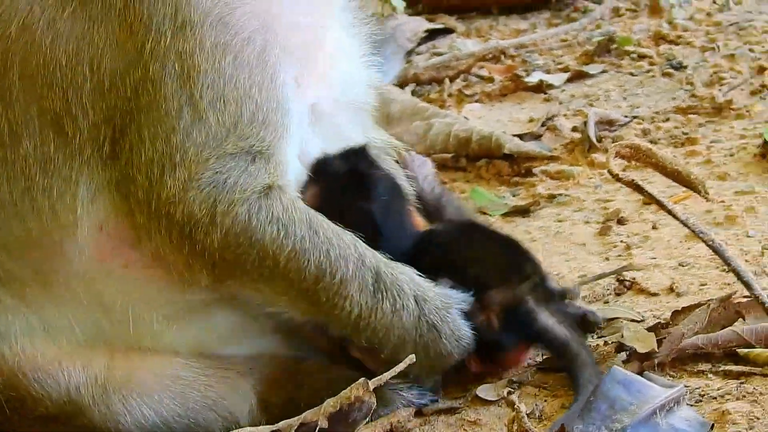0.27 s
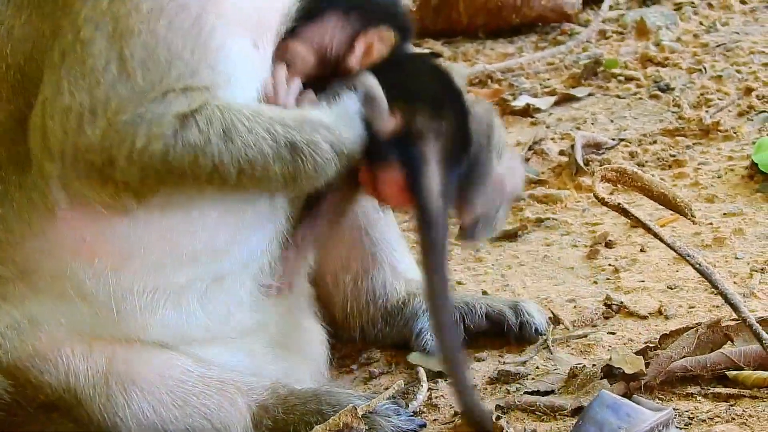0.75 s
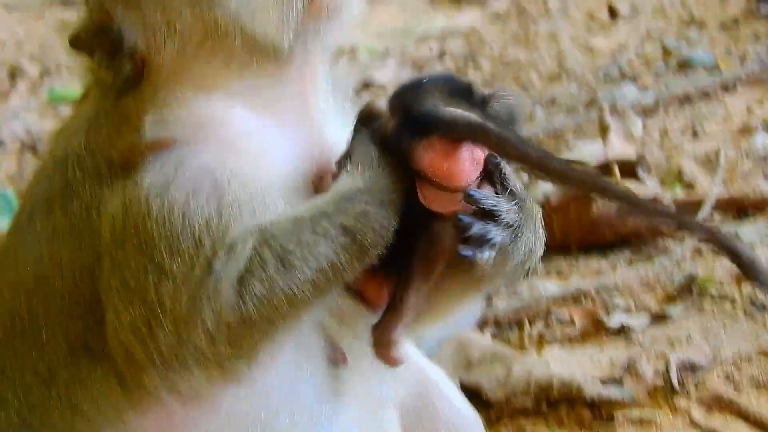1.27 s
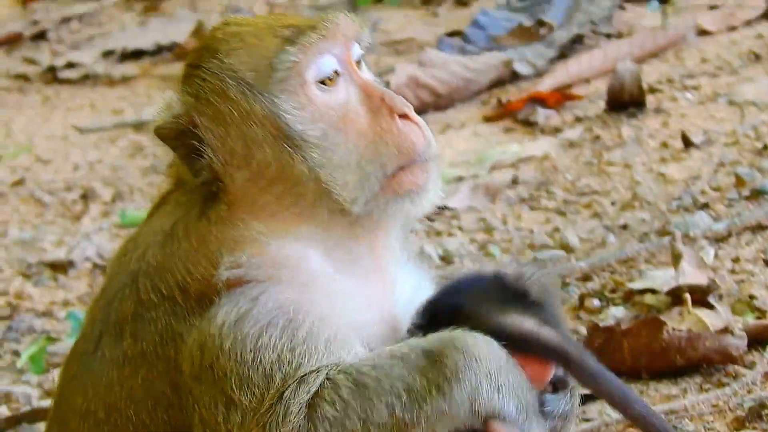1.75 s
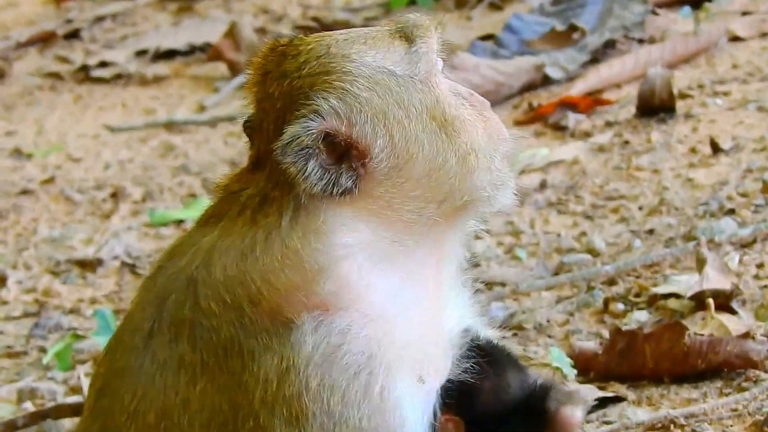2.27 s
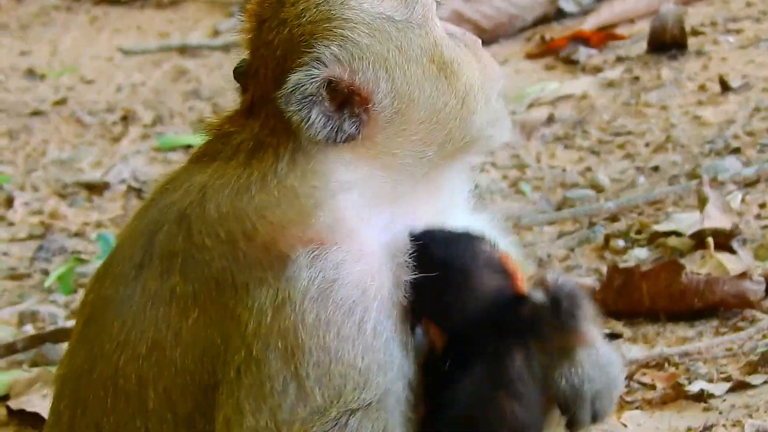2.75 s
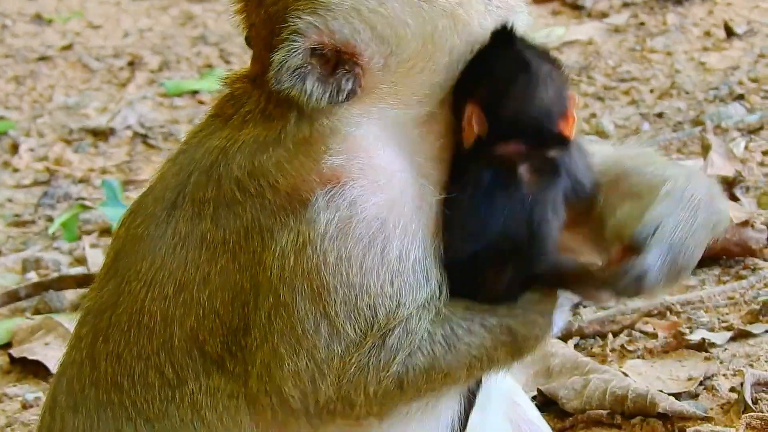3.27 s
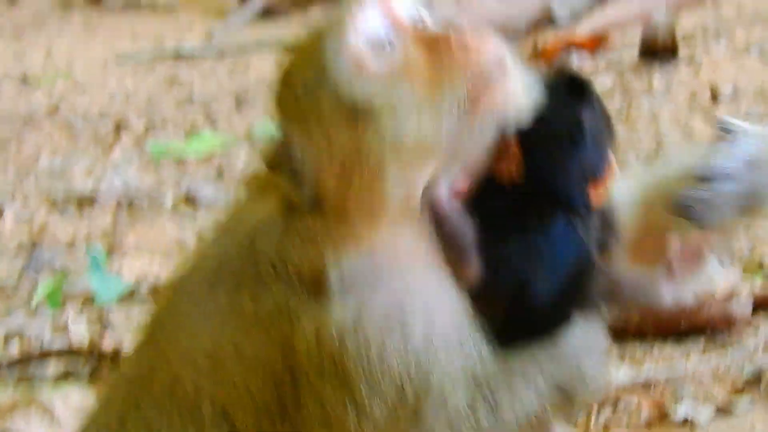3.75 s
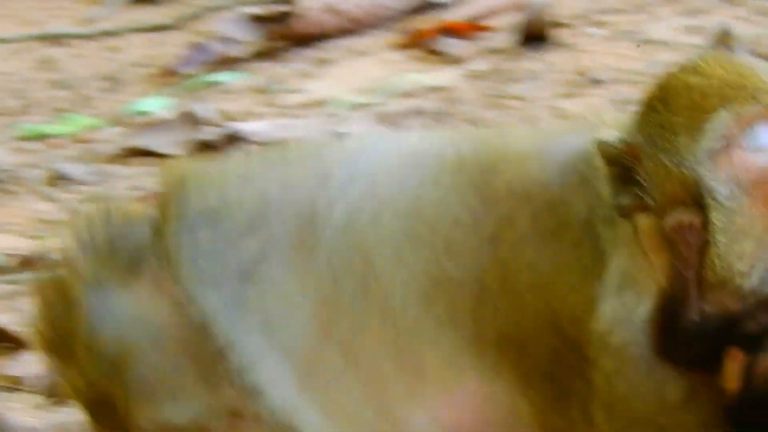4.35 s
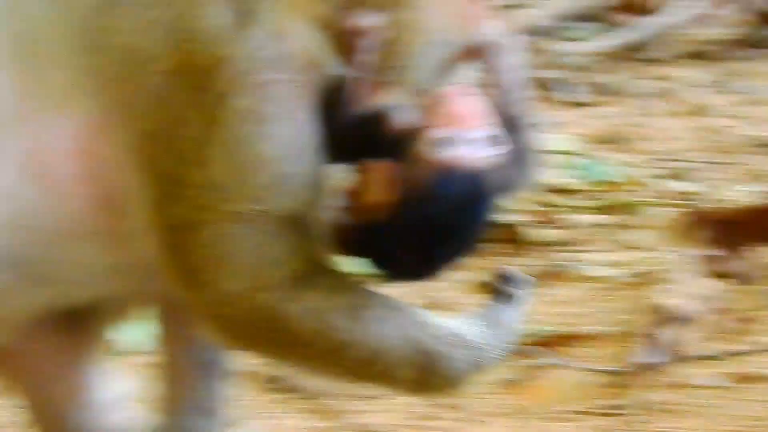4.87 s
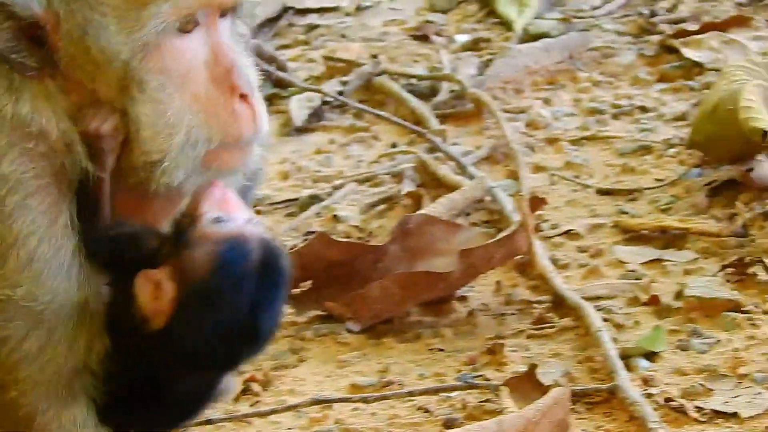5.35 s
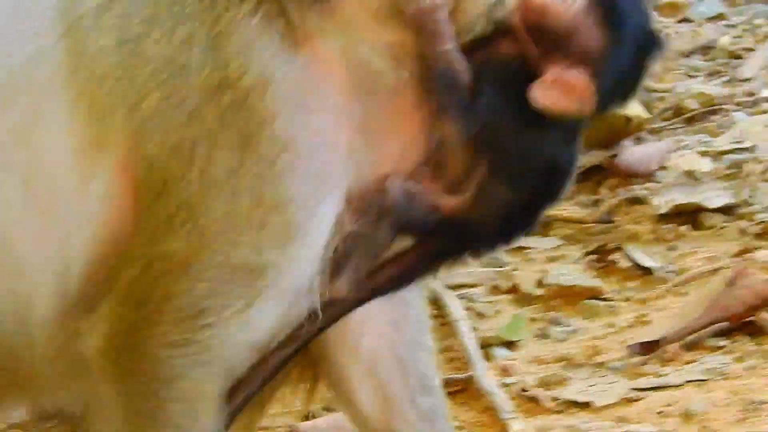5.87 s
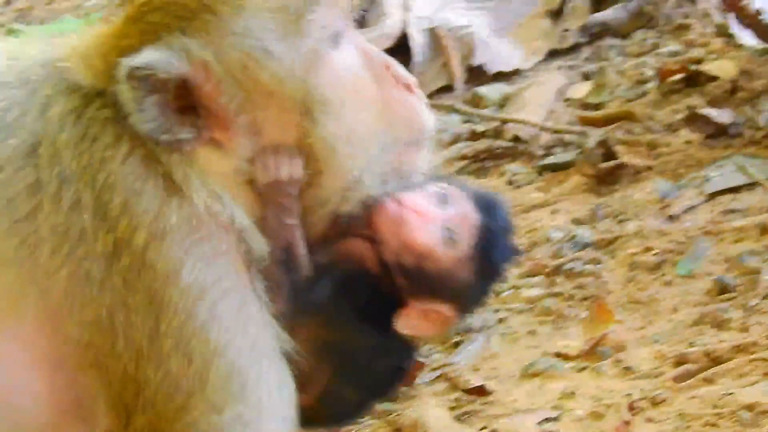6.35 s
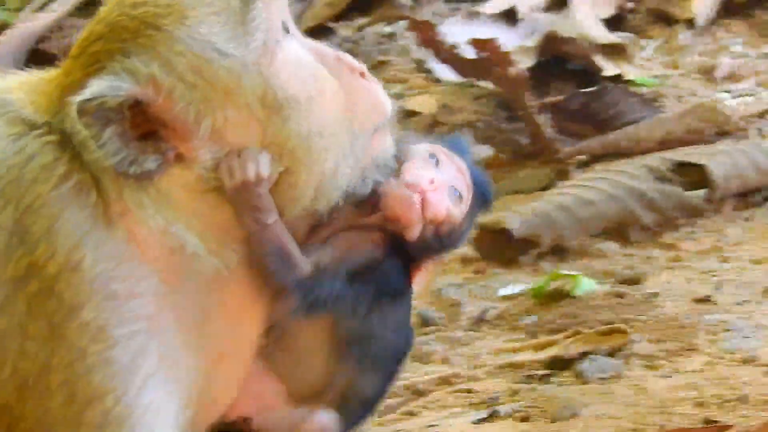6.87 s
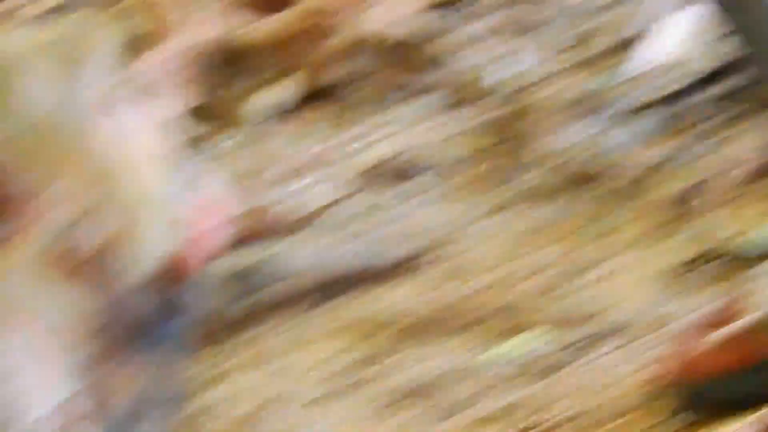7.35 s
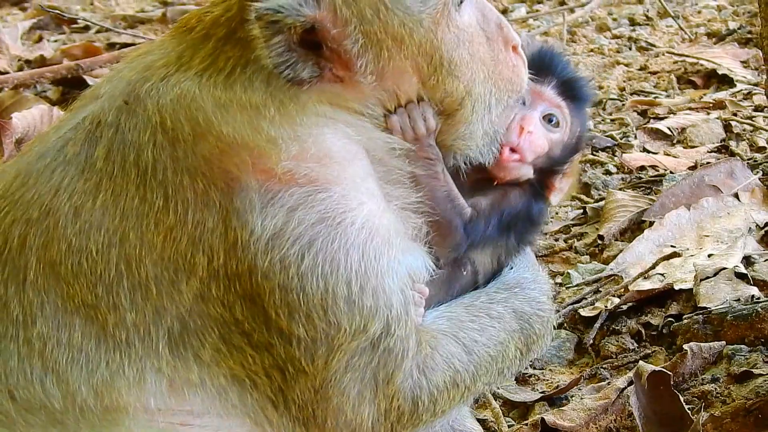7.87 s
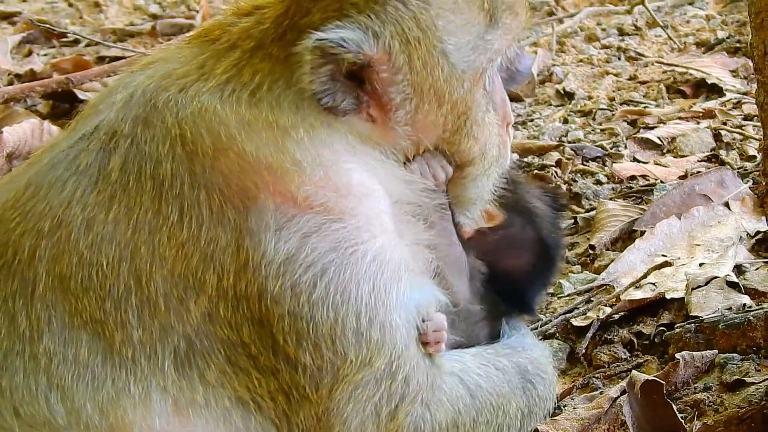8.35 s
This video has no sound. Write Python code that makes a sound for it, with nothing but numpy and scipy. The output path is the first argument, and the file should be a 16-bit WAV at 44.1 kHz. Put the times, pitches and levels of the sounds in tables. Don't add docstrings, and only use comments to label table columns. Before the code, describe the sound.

A dense, shrill cicada drone pulses steadily; a bird repeats short echoing notes, soft steps crush litter, and a sharp leaf crack comes at the end.

```python
import sys
import numpy as np
from scipy import signal
from scipy.fft import rfft, irfft, next_fast_len
from scipy.io import wavfile

SR = 44100
rng = np.random.default_rng(int(sys.argv[2]) if len(sys.argv) > 2 else 0)


def transcribe(u):
    v = np.clip(np.atleast_2d(u).T, -1, 1)
    q = np.round(v * 32767).astype(np.int16)
    wavfile.write(sys.argv[1], SR, q)


def volts(x):
    e = np.asarray(x, float) / 20
    return 10 ** e


N = 379701
LEAD = SR // 4
SIZE = next_fast_len(N + 2 * SR)
HZ = np.maximum(np.arange(SIZE // 2 + 1) * SR / SIZE, 1)

# (frequency [Hz], density [dB per Hz])
HISS_COLOUR = [(4000, -7.5), (6800, -3), (7570, -7.5), (8540, -4.5), (9830, -10), (10900, -10), (12400, -7),
               (13300, -13), (15500, -23.5)]


def in_time(rows):
    s, db = np.transpose(rows)
    return np.interp(np.arange(N) / SR, s, db)


def at_hz(points):
    hz, value = np.transpose(points)
    return np.interp(np.log(HZ), np.log(hz), value)


def rms_one(x):
    return x / np.sqrt(np.mean(x ** 2) + 1e-20)


def drift(rate_hz):
    knots = int(N / SR * rate_hz * 2) + 2
    return np.interp(np.linspace(0, knots - 1, N), np.arange(knots), rng.standard_normal(knots)) * 1.22


def tilt(left_minus_right_db):
    return volts(left_minus_right_db * np.array([[.5], [-.5]]))


def coloured(spectrum, source):
    # (frequency [Hz], left-right likeness [-1..1])
    likeness = [(40, 1), (150, 0.9), (400, 0.61), (1000, 0.6), (3000, 0.66), (4700, 0.46), (7000, 0.013),
                (12000, -0.2)]
    mid, side = rfft(source, SIZE) * volts(at_hz(spectrum))
    alike = np.clip(at_hz(likeness), -1, 1)
    pair = np.sqrt(1 + alike) * mid + np.sqrt(1 - alike) * side * [[1], [-1]]
    return rms_one(irfft(pair, SIZE)[:, :N])


def add(track, s, sound):
    at = round(s * SR) + LEAD
    track[at:at + len(sound)] += sound


def rumble():
    # (time [s], level [dB])
    swell_db = [(0, -46.5), (.8, -45), (2.3, -46.5), (2.9, -44.5), (3.0, -41), (3.2, -45), (4.6, -46.5),
                (5.8, -45), (8.61, -45)]
    # (frequency [Hz], density [dB per Hz])
    colour = [(12, -46), (20, -29), (60, -0.5), (108, 0.5), (186, -6), (211, -9), (264, -20.5), (330, -19),
              (430, -61), (730, -120)]
    level_db = in_time(swell_db) + 1.13 * drift(5)
    return volts(level_db) * coloured(colour, rng.standard_normal((2, N))) * tilt(-.9)


def foliage():
    # (frequency [Hz], density [dB per Hz])
    colour = [(120, -13.5), (200, -0.5), (274, -15.5), (452, -12), (658, -14), (983, -22.5), (1930, -12),
              (2190, -16), (3530, -20), (3710, -23), (4000, -12), (5200, -25), (8800, -120)]
    # (time [s], level [dB])
    gusts = [(0, 5.5), (.5, 1.5), (1.75, -2.5), (3.2, 3.5), (4.05, 2), (5, 0), (6.55, -6.5), (7, -2),
             (7.9, -3), (8.61, 0.5)]
    air = coloured(colour, rng.standard_normal((2, N)))
    low = signal.sosfilt(signal.butter(2, 1400, fs=SR, output="sos"), air)
    gust_db = in_time(gusts)
    branches = volts(-56.5 - .05 * gust_db + 2.4 * drift(6)) * rms_one(low)
    leaves = volts(-55 + gust_db + 1.3 * drift(8)) * rms_one(air - low)
    return (branches + leaves) * tilt(-.9)


def hiss():
    return volts(-56 + .45 * drift(17)) * coloured(HISS_COLOUR, rng.standard_normal((2, N)))


def steps():
    # (time [s], peak [dB], t60 [s])
    footfalls = [(0.302, -39, 0.091), (2.998, -42, 0.12), (4.616, -52, 0.24), (5.279, -47, 0.13),
                 (5.599, -39, 0.13), (5.822, -47, 0.15), (5.956, -43, 0.11), (6.025, -42, 0.11),
                 (6.216, -43.5, 0.2), (7.413, -41, 0.19), (7.569, -47, 0.15), (7.943, -46.5, 0.31),
                 (8.519, -53, 0.12)]
    # (frequency [Hz], level [dB])
    colour = [(150, -23), (300, 16), (1000, 10), (2500, -3), (5000, -41), (9000, -40)]
    swell, t = np.zeros(SIZE), np.arange(SR // 4) / SR
    for s, peak_db, t60_s in footfalls:
        attack = np.clip(t / .006, 0, 1)
        add(swell, s, volts(peak_db - 7 - 60 * t / max(t60_s, .01)) * attack)
    return swell[LEAD:LEAD + N] * coloured(colour, rng.standard_normal((2, N)))


def snaps():
    # (time [s], peak [dB], ring [Hz], ring t60 [s])
    cracks = [
        (3.474, -36, 6000, 0.02),
        (3.7229, -29, 6300, 0.02),
        (3.957, -34, 6050, 0.022),
        (4.4796, -30, 6000, 0.012),
        (4.6543, -31.5, 5930, 0.02),
        (4.8808, -31.5, 6170, 0.02),
        (4.8884, -49, 6160, 0.02),
        (5.283, -31, 6170, 0.02),
        (8.53, -21, 6300, 0.029),
        (8.5354, -35, 6130, 0.02),
    ]
    # (time [s], peak [dB], ring [Hz], ring t60 [s])
    knocks = [(8.5197, -32.5, 2970, 0.0047)]
    out, t = np.zeros((2, SIZE)), np.arange(SR // 10) / SR
    for s, peak_db, hz, t60_s in [*cracks, *knocks]:
        band = signal.butter(3, [hz * 0.68, min(hz * 1.16, 15000)], "band", fs=SR, output="sos")
        grit = rng.standard_normal((3, len(t)))
        grit[:, 0] = 4
        shape = volts(-60 * t / max(t60_s, .002)) + volts(-11 - 60 * t / .13)
        crack = signal.sosfilt(band, (grit[0] + .5 * grit[1:]) * shape)
        for side in range(2):
            add(out[side], s, volts(peak_db) * crack[side] / abs(crack).max())
    return out[:, LEAD:LEAD + N]


def crickets():
    # (frequency [Hz], width [Hz], level [dB])
    trills = [(656.6, 41, -72), (3390, 20, -93), (3445, 30, -85), (3580, 32, -86), (3800, 30, -70.5),
              (3810, 29, -90), (4100, 40, -86), (4000, 84, -75), (4020, 58, -63.5)]
    out, white = 0, rng.standard_normal((3, N))
    for hz, width_hz, level_db in trills:
        r = np.exp(-np.pi * width_hz / SR)
        stage = [1, 0, -1, 1, -2 * r * np.cos(2 * np.pi * hz / SR), r * r]
        trill = signal.sosfilt([stage, stage], white[0] + 0.47 * white[1:])
        out = out + volts(level_db + 2.8 * drift(1.8)) * rms_one(trill)
    return out


def katydids(wander):
    # (tooth strikes [per s], level [dB], left minus right [dB])
    files = [(285.5, -66.5, 4), (285.1, -67, -4), (284.2, -69, 2), (282.6, -70, -3)]
    out, t = 0, np.arange(SR // 8) / SR
    for per_s, level_db, pan_db in files:
        angle = np.pi * (np.cumsum(per_s * (1 + wander * drift(6)) / SR) + rng.random())
        pulses = np.sin(111 * angle) / (np.sin(angle) + 1e-9)
        smear = rfft(rng.standard_normal((2, len(t))) * volts(-60 * t / .025), SIZE)
        train = rfft(pulses, SIZE) * volts(at_hz(HISS_COLOUR)) * smear
        power = 2 * np.mean(np.sum(abs(train) ** 2, axis=1)) / SIZE / N
        out = out + volts(level_db) * tilt(pan_db) * train / np.sqrt(power)
    return irfft(out, SIZE)[:, :N]


def trees(trunks, alike):
    # (frequency [Hz], swell [s], then t60 [s])
    bands = [(900, 0.085, 0.39), (1500, 0.088, 0.66), (2580, 0.11, 0.9), (3060, 0.13, 1),
             (3700, 0.24, 0.99), (7000, 0.11, 1)]
    t, out = np.arange(SR) / SR, 0
    centres = np.log(np.array(bands)[:, 0])
    mid, side = rng.standard_normal((2, SR))
    pair = np.sqrt((1 + alike) / 2) * mid + np.sqrt((1 - alike) / 2) * side * np.array([[1], [-1]])
    single = np.interp(t, np.linspace(0, 1, 250), rng.standard_normal(250))
    pair = rms_one(pair * volts(3 * single * np.exp(-t / .25)))
    trunk_db = np.interp(t, *np.transpose(trunks))
    for k, (hz, swell_s, t60_s) in enumerate(bands):
        shape = np.clip(t / 0.0093, 0, 1) * volts(trunk_db - 60 * np.maximum(t - swell_s, 0) / t60_s)
        share = np.interp(np.log(HZ), centres, np.arange(len(bands)) == k)
        out = out + share * rfft(pair * shape / np.sqrt(np.sum(shape ** 2)), SIZE)
    return out


def far_birds(direct, far):
    # (time [s], first pitch [Hz], echo level [dB])
    slurs = [(-.1, 3700, -55.5), (0, 1795, -60), (1.127, 1800, -63.5), (2.202, 1910, -61),
             (2.467, 1685, -61), (3.867, 3610, -55), (4.15, 2090, -57.5), (4.6, 1954, -59.5),
             (5.049, 1855, -67), (5.351, 1866, -66), (5.724, 1840, -65.5), (8.003, 2360, -65.5)]
    # (time [s], first pitch [Hz], echo level [dB])
    chips = [(.057, 2630, -61), (2.038, 2180, -61), (2.448, 2330, -59), (3.252, 7340, -61),
             (3.636, 1486, -63.5), (3.7, 3580, -61), (3.74, 1650, -64), (3.82, 2125, -57.5),
             (3.86, 1960, -54.5), (3.903, 2240, -55), (3.961, 2715, -55.5), (4.325, 1835, -56.5),
             (4.342, 2270, -62), (8.287, 2200, -58.5), (8.373, 2060, -62), (8.423, 1497, -64.5),
             (8.485, 1380, -67)]
    # (time [s], first pitch [Hz], echo level [dB])
    lifts = [(.462, 816, -72.5), (1.85, 1760, -65), (4.522, 2000, -57), (5.88, 1294, -70),
             (7.96, 1265, -70.5), (8.542, 2000, -65)]
    # (time [s], first pitch [Hz], echo level [dB])
    pipes = [(2.356, 2026, -53.5), (3.22, 7030, -58.5), (3.36, 3810, -59), (3.635, 3960, -52.5),
             (3.752, 3420, -53.5), (4.31, 3498, -55.5), (6.32, 3500, -70), (.85, 3390, -61)]
    # (time [s], first pitch [Hz], echo level [dB])
    held = [(-.08, 2133, -46.5), (.5, 2567, -64), (.712, 1370, -64.5), (3.467, 3750, -50.5),
            (3.58, 3580, -58), (3.5, 1845, -59), (3.519, 1660, -69), (4.754, 1258, -66.5),
            (6.96, 3530, -66.5), (7.037, 1347, -68), (7.118, 3800, -65), (7.5, 3240, -62.5),
            (7.75, 3140, -66.5), (7.96, 3840, -66), (8.146, 3600, -69)]
    # (time [s], first pitch [Hz], echo level [dB])
    drones = [(5.032, 1945, -59.5), (5.646, 1940, -61)]
    # (time [s], first pitch [Hz], echo level [dB])
    sweeps = [(3.945, 1154, -59), (3.95, 1852, -59)]
    # (time [s], first pitch [Hz], echo level [dB])
    flicks = [(3.862, 3480, -58), (4.79, 2085, -59.5)]
    # (time [s], first pitch [Hz], echo level [dB])
    peeps = [(3.91, 900, -72), (4.48, 3420, -64.5), (7.41, 1724, -73), (7.5, 1725, -76), (7.53, 1954, -72)]
    # (notes, length [s], last pitch over first [ratio], direct share [dB])
    songs = [(slurs, .075, .83, -7), (chips, .047, .91, 1.05), (lifts, .053, 1.08, 4.8),
             (pipes, .063, 1, -.3), (held, .1044, .95, -4), (drones, .518, .94, -4),
             (sweeps, .06, 1.6, 4.4), (flicks, .02, .63, -15), (peeps, .048, .97, 11.5)]
    for notes, length_s, slur, direct_db in songs:
        for s, first_hz, level_db in notes:
            u = np.linspace(0, 1, int(length_s * SR))
            waver = np.interp(u, np.linspace(0, 1, 24), rng.standard_normal(24))
            last_hz = slur * first_hz
            unsteady = .006 + abs(slur - 1) / 5
            hz = (first_hz + (last_hz - first_hz) * u) * (1 + unsteady * waver)
            gain = volts(level_db) * np.sqrt(1.25 / length_s)
            note = gain * np.sin(np.pi * u) ** .5 * np.sin(2 * np.pi * np.cumsum(hz) / SR)
            add(far, s, note)
            add(direct, s, volts(direct_db - 6) * note)


def near_bird(direct, near):
    # (time [s], fundamental [dB], octave [dB], hook [dB], sag of pitch [share])
    calls = [
        (0.181, -45, -34.5, 1, 0.0052),
        (0.796, -43.5, -37, 8, 0.006),
        (1.515, -42.5, -32.5, -1.5, 0.014),
        (2.81, -45.5, -33, -4, 0.052),
        (6.665, -49, -35, -9.5, 0.051),
    ]
    for s, low_db, octave_db, hook_db, sag in calls:
        start_hz = 1536.5 * (1 - 0.28 * sag)
        held_s = .034 + .12 * sag
        t = np.arange(int((held_s + .009) * SR)) / SR
        sagged = np.clip((t - .022) / .012, 0, 1)
        fall = np.clip((t - held_s) / .009, 0, 1)
        hz = start_hz * (1 - sag * sagged - 0.216 * fall ** 1.54)
        phase = 2 * np.pi * np.cumsum(hz) / SR
        shape = np.sqrt(2) * np.clip(t / 0.0023, 0, 1) * np.clip((t[-1] - t) / 0.0012, 0, 1)
        low = volts(low_db - 8.6 * fall - 59 * sag * sagged) * np.sin(phase)
        high = volts(hook_db * np.sqrt(fall) - 5.3 * fall ** 4) * np.sin(2 * phase)
        high += volts(-13.5 - 20 * fall) * np.sin(4 * phase)
        note = shape * (low + volts(octave_db - 160 * sag * (1 - sagged)) * high)
        add(near, s, note)
        add(direct, s, volts(-9 - 7 * fall - 90 * sag * sagged) * note)
        add(direct, s, volts(-14 + 210 * sag) * shape * low)
        add(direct, s + .0105, volts(-14) * note)


def birds():
    # (delay [s], strength [dB])
    near_trunks = [(0, -9), (.06, -5), (.11, -4), (.145, 1), (.18, -1), (.22, 1), (.3, 0)]
    # (delay [s], strength [dB])
    far_trunks = [(0, 4.5), (.05, -6), (.1, -4), (.15, -3.5), (.22, -2.5), (.35, 1)]
    direct, near, far = np.zeros((3, SIZE))
    far_birds(direct, far)
    near_bird(direct, near)
    heard = direct[LEAD:LEAD + N] * volts(4 * drift(40))
    clouds = rfft(near) * trees(near_trunks, alike=0.9) + rfft(far) * trees(far_trunks, alike=0.87)
    echoes = irfft(clouds, SIZE)[:, LEAD:LEAD + N] * volts(1.2 * drift(30))
    return (heard + echoes) * tilt(-.8)


def throb_db():
    # (a beat at [s], pace [beats per s], change of pace [beats per s2],
    # depth [dB], stands out for [s])
    singers = [(5.207, 4.385, -.1, 1.22, 4), (5.326, 4.98, .02, .9, 2.5), (3.651, 3.04, .2, .57, 4),
               (1.415, 5.32, 0, .64, 4), (6.86, 4.47, .1, .41, 4)]
    out = -37 + 1.4 * drift(12)
    for s, per_s, change, depth_db, lasts_s in singers:
        t = np.arange(N) / SR - s
        beat = 2 * np.pi * (per_s * t + change * t ** 2 / 2)
        pulse = np.cos(beat) + 0.12 * np.cos(2 * beat)
        out = out + 0.85 * depth_db * np.exp(-(t / lasts_s) ** 2 / 2) * pulse
    return out


def cicadas(clicks_per_s, spread_db):
    # (frequency [Hz], density [dB per Hz])
    tymbal = [(2120, -40.5), (3600, -39), (3800, -41), (3840, -27.5), (3970, -15.5), (4200, -5),
              (4380, 1.5), (4640, 3.5), (4930, 1.5), (5840, -16), (6680, -22), (7480, -34.5), (8000, -31.5),
              (10400, -44), (17600, -120)]
    sizes = volts(spread_db * np.minimum(rng.exponential(1, (2, N)), 3)) * rng.choice([-1, 1], (2, N))
    clicks = sizes * (rng.random((2, N)) < clicks_per_s / SR)
    return volts(throb_db()) * coloured(tymbal, clicks) * tilt(1)


def scene():
    background = rumble() + foliage() + hiss() + steps() + snaps()
    insects = crickets() + katydids(wander=.0006) + cicadas(clicks_per_s=9000, spread_db=2.5)
    return background + birds() + insects


def low_pass(x):
    return signal.sosfilt(signal.butter(12, 15640, fs=SR, output="sos"), x)


def record(dry):
    mix = dry - .0004
    return low_pass(mix)


dry = scene()
out = record(dry)
transcribe(out)
```